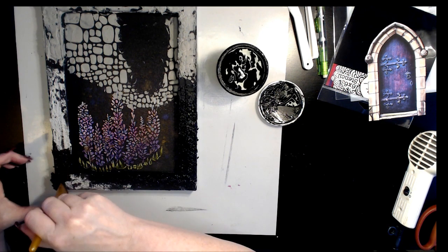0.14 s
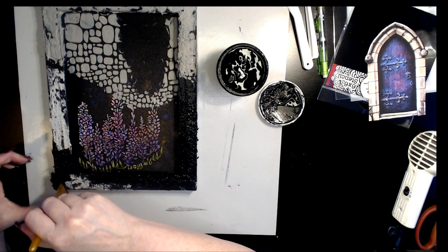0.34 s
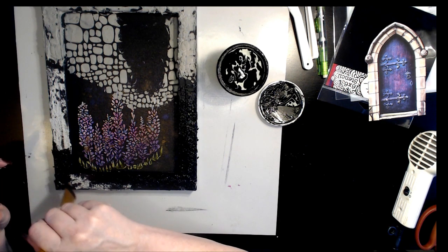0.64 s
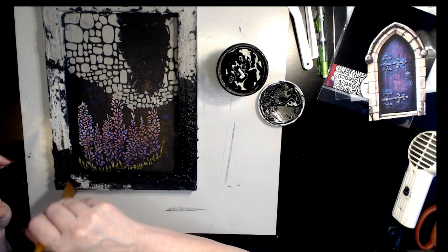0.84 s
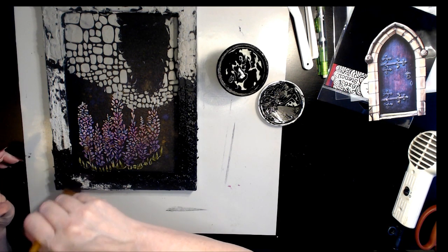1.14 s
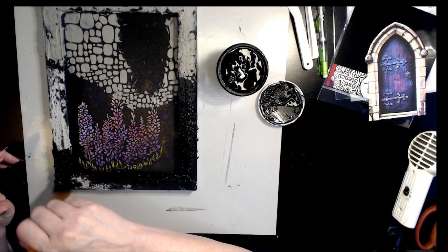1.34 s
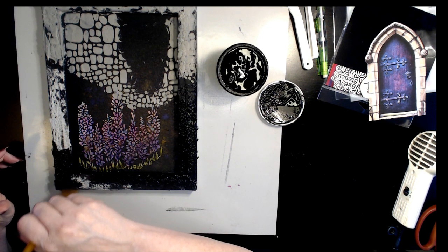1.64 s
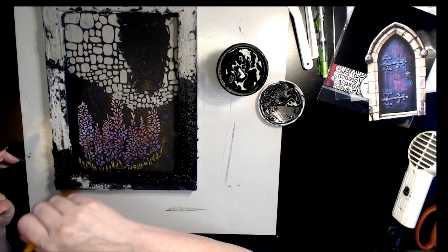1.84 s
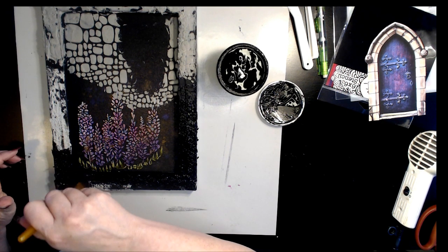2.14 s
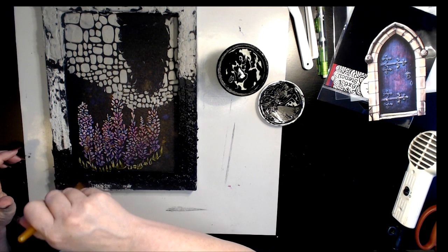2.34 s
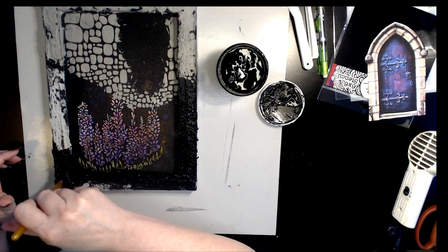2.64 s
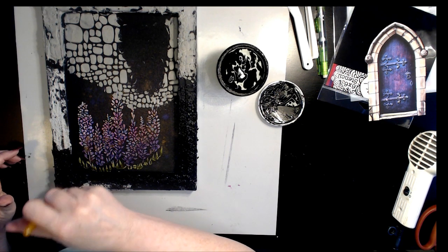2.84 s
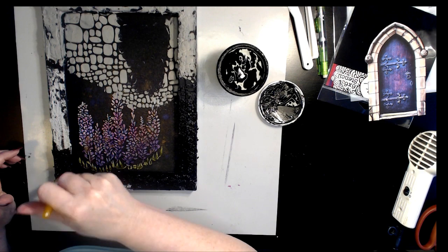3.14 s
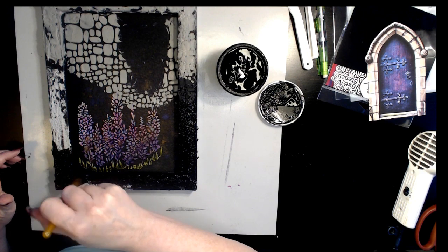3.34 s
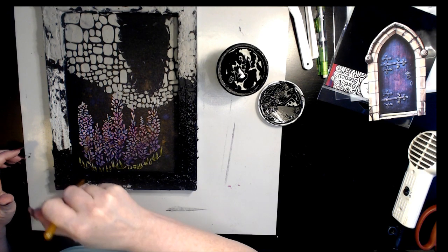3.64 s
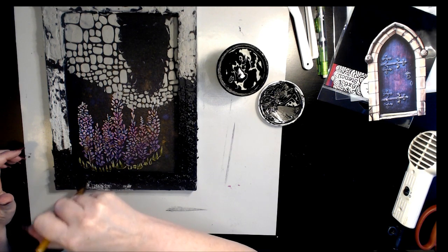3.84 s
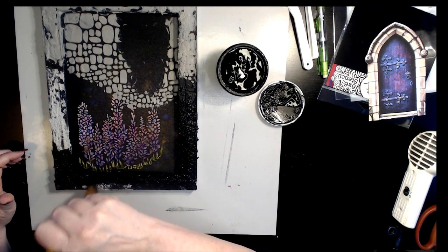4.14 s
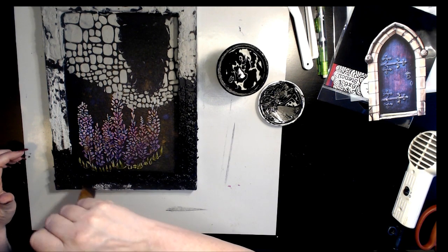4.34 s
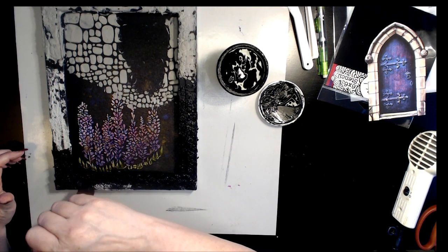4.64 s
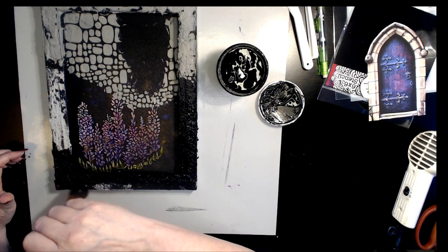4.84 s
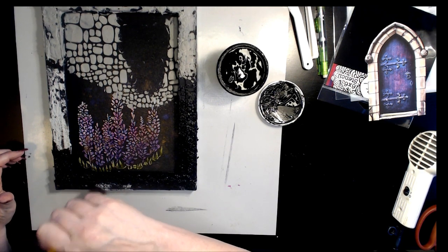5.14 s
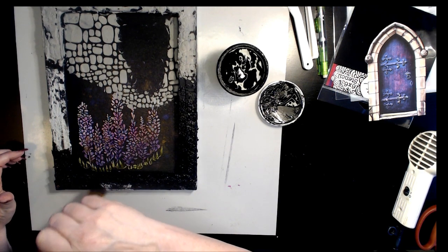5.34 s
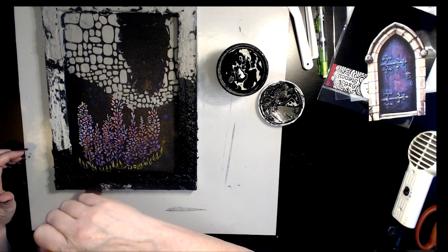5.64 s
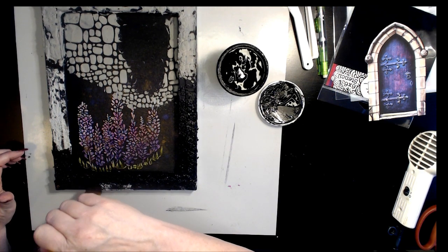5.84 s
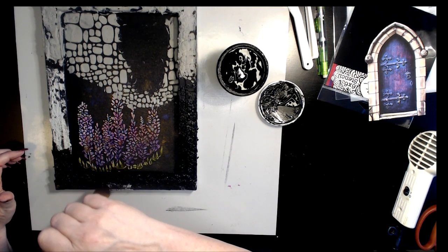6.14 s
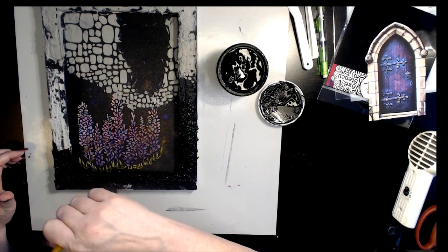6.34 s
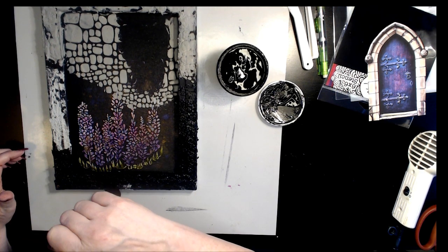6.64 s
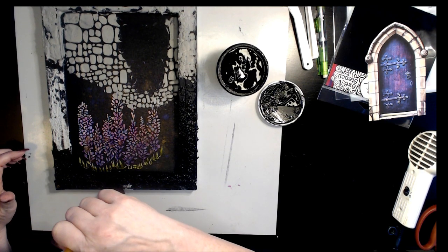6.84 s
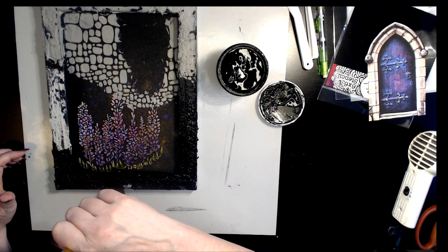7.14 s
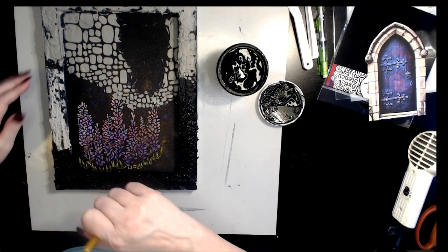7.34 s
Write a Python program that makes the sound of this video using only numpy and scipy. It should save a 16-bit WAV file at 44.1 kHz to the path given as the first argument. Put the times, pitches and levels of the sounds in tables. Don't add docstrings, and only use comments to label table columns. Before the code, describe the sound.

Close on a desk indoors, a computer fan hisses and hums steadily. A soft brush dabs a canvas at irregular short intervals, giving faint low thumps that shake the desk, with tiny sticky paint ticks. A distant engine briefly swells and recedes. From about 5.7 seconds the brush's metal collar knocks the wooden frame eight times, dipping softer, then ending very loud.

```python
import sys
import numpy as np
from scipy import signal
from scipy.io import wavfile
from scipy.ndimage import uniform_filter1d

SR = 44100
rng = np.random.default_rng(int(sys.argv[2]) if len(sys.argv) > 2 else 0)


def pcm_store(signal):
    levels = np.round(np.clip(np.atleast_2d(signal), -1, 1) * 32767)
    wavfile.write(sys.argv[1], SR, levels.astype(np.int16).T)


def magnitude_from_level(level_db):
    exponent = np.asarray(level_db, float) / 20
    return 10 ** exponent


N = 330309


def evened(x):
    return x / np.sqrt(np.mean(x ** 2) + 1e-20)


def add(mix, start_s, sound):
    part = mix[round(start_s * SR):][:len(sound)]
    part += sound[:len(part)]


def resonate(x, hz, width_hz):
    r = np.exp(-np.pi * width_hz / SR)
    pole = r * np.exp(2j * np.pi * hz / SR)
    return 2 * signal.lfilter([1 - r], [1, -pole], x).real


def resonate_twice(x, hz, width_hz):
    return resonate(resonate(x, hz, width_hz), hz, width_hz)


def ring(modes, pitch_factor=1):
    t = np.arange(SR // 3) / SR
    out = np.zeros(len(t))
    for hz, db, t60_s, sign in modes:
        out += sign * magnitude_from_level(db - 60 * t / t60_s) * np.sin(2 * np.pi * hz * pitch_factor * t)
    return out


def pulse(ms):
    bump = np.hanning(int(ms * SR / 1000) + 3)
    return bump / bump.sum()


# start in seconds, canvas level in dB, desk push in dB, spot along the edge (about
DABS = [(0.04, -57, -43, 0.025), (0.32, -47, -59, .5), (0.405, -50, -48, 0.86), (0.624, -54, -37, -.6),
        (0.804, -45, -56, 0.93), (0.973, -37, -29.5, 0.64), (1.075, -62, -39, -0.76),
        (1.156, -43, -34, 0.62), (1.299, -47, -44, 0.046), (1.516, -49, -28.5, -0.42),
        (1.697, -51, -36.5, .3), (1.921, -43, -34, -.1), (1.989, -60, -42, -.1),
        (2.141, -46.5, -38.5, -0.016), (2.363, -46, -43, 0.11), (2.558, -47, -34, 0.27),
        (2.653, -44.5, -26, -0.13), (2.849, -41, -29.5, 0.4), (3.035, -44, -20.5, 0.22),
        (3.205, -45.5, -28.5, 0.41), (3.385, -46, -27, -0.93), (3.909, -52, -40.5, -.5),
        (4.23, -37, -24, -0.57), (4.419, -40.5, -24.5, -0.92), (4.606, -59, -37.5, -.3),
        (4.94, -60, -34, -.1), (5.037, -58, -31.5, -1.1), (5.132, -41.5, -28.5, 1.08),
        (5.296, -44, -25.5, -.5), (5.627, -52, -32, -0.35)]
# frequency in Hz, level in dB, t60 in seconds, sign.
CANVAS = [(211, -9, 0.18, 1), (294, 2, 0.16, -1.12), (358, -0.5, 0.15, 0.91), (475.5, -1, 0.17, -0.91),
          (650, -7, 0.05, 1)]


def dabs():
    swell_s, push_lag_s = 0.0055, 0.0061
    out = np.zeros(N)
    t = np.arange(SR // 8) / SR
    pushes = []
    for s, canvas_db, push_db, spot in DABS:
        tilt_db_per_octave = 3.5 - 8 * spot
        modes = []
        for hz, db, t60_s, sign in CANVAS:
            shift, lift = rng.standard_normal(2)
            mode_db = db + 2.2 * lift + tilt_db_per_octave * np.log2(hz / 300)
            modes.append((hz * (1 + 0.016 * shift), mode_db, t60_s, sign))
        thud = ring(modes)[:len(t)] * (1 - np.exp(-(t / swell_s) ** 2))
        add(out, max(s - 0.003, 0), magnitude_from_level(canvas_db - 2.5) * thud / abs(thud).max())
        upper_db, low_db = -12 + 11 * spot, -1.2 * spot
        pushes.append((s + push_lag_s, push_db, upper_db, low_db))
    return out + desk(pushes)


# start in seconds, knock level in dB, desk push in dB, frame pitch factor.
KNOCKS = [
    (5.702, -17.5, -13, 0.92),
    (5.8801, -15.5, -13, 0.91),
    (6.056, -25.5, -18, 0.9),
    (6.222, -29, -20.5, 0.93),
    (6.4046, -18.5, -14, 0.91),
    (6.571, -8, -9, 0.98),
    (6.755, -9.5, -10.5, 0.97),
    (6.914, 0.18, -5, 0.99),
]
# frequency in Hz, level in dB, t60 in seconds, sign.
FRAME = [(222, -15.5, 0.11, 0.83), (268, -27, 0.16, 1), (362, -2, 0.051, 0.38), (479, 1, 0.021, -0.76),
         (510, -21, 0.058, 1), (635, -7, 0.015, -0.72), (718, -26, 0.12, 0.75), (776, -28, .06, -0.89),
         (933, -33.5, 0.14, 0.75), (1176, -34, 0.12, -0.55)]


def knocks():
    frame_db, chatter_db, chatter_t60_s = 4.5, -17.5, 0.094
    out = np.zeros(N)
    t = np.arange(3000) / SR
    for s, db, _, pitch_factor in KNOCKS:
        taps = rng.standard_normal(len(t)) * (rng.random(len(t)) < 0.08)
        force = taps * magnitude_from_level(chatter_db + 0.47 * db - 60 * t / chatter_t60_s) * (t > 0.006)
        force[0] = 1
        contact_ms = 0.94 - 0.04 * db
        force = signal.oaconvolve(force, pulse(contact_ms))
        add(out, s, magnitude_from_level(db + frame_db) * signal.oaconvolve(ring(FRAME, pitch_factor), force))
    return out + desk([(s, push_db, -3, 0) for s, _, push_db, _ in KNOCKS])


# frequency in Hz, level in dB, t60 in seconds, sign at the microphone foot.
DESK = [(28, -34.5, 0.18, -0.66), (48, -28.5, 0.34, 0.82), (64, -15.5, 0.2, -0.55),
        (85.17, 0.5, 0.47, 0.72), (95.6, 3, 0.24, -0.86), (119.7, -21, 0.53, 0.93)]
# frequency in Hz, level in dB, t60 in seconds, sign at the microphone foot.
DESK_UPPER = [(146.2, 1, 0.17, 0.85), (156, -1.5, 0.22, -0.81), (207.2, -2.5, 0.058, -0.79),
              (227.7, -5, 0.063, 1)]


def desk(pushes):
    push_ms, lag_ms, desk_db = 6.76, 2.84, 5
    out = np.zeros(N)
    for s, push_db, upper_db, low_db in pushes:
        low = ring([(hz, db + low_db * (hz < 90), t60_s, sign) for hz, db, t60_s, sign in DESK])
        modes = low + magnitude_from_level(upper_db + 3.5) * ring(DESK_UPPER)
        start_s = s + (lag_ms - push_ms / 2) / 1000
        add(out, start_s, magnitude_from_level(push_db + desk_db) * signal.oaconvolve(modes, pulse(push_ms)))
    return out


# start in
# seconds, peak in dB, centre in Hz.
TICKS = [(.022, -44, 5500), (0.6295, -30.5, 5000), (0.6293, -39, 9500), (.858, -44, 6300),
         (0.9925, -42, 6300), (1.100, -52, 14500), (1.431, -42, 12500), (1.615, -49, 11500),
         (1.7968, -43, 12000), (5.701, -56, 11000), (5.740, -36, 8200), (5.7508, -37.5, 8750),
         (5.760, -47, 9000), (5.916, -31.5, 9200), (5.926, -46, 9000), (6.081, -49, 9500),
         (6.090, -41, 10500), (6.118, -50, 11000), (6.257, -44, 9400), (6.273, -39, 8500),
         (6.436, -45, 9500), (6.446, -48, 12000), (6.531, -49, 10060), (6.9148, -29, 2000),
         (6.9147, -52, 5000)]


def ticks():
    snap_t60_s, tail_t60_s, tail_db = 0.0079, 0.054, -13.5
    out = np.zeros(N)
    t = np.arange(1600) / SR
    for s, peak_db, hz in TICKS:
        decay = magnitude_from_level(-60 * t / snap_t60_s) + magnitude_from_level(tail_db - 60 * t / tail_t60_s)
        burst = rng.standard_normal(len(t)) * decay
        burst[0] += 3
        snap = resonate_twice(burst, hz, 2400 + 0.33 * hz)
        add(out, s, magnitude_from_level(peak_db) * snap / abs(snap).max())
    return out


# frequency in Hz, width in Hz, level in dB.
BRISTLES = [(5500, 1500, 9.5), (7800, 2700, -2.5), (10300, 2000, -2), (14500, 4000, -26)]


def drag():
    slip_s, lead_s, slip_db, rise_db_per_s, fall_db_per_s = 6.748, 0.07, -45, 380, 300
    trail_db, trail_hold_s, trail_db_per_s, lift_db = -53.5, 0.057, 230, -66
    t = np.arange(-lead_s, 0.25, 1 / SR)
    trail = np.maximum(trail_db - trail_db_per_s * np.maximum(t - trail_hold_s, 0), lift_db)
    fall = np.maximum(slip_db - fall_db_per_s * t, trail)
    level = magnitude_from_level(np.where(t < 0, slip_db + rise_db_per_s * t, fall))
    grain_db = 3 * evened(uniform_filter1d(rng.standard_normal(len(t)), size=60))
    grains = rng.standard_normal(len(t)) * magnitude_from_level(grain_db)
    rush = sum(magnitude_from_level(db) * resonate_twice(grains, hz, 1.4 * width_hz) for hz, width_hz, db in BRISTLES)
    out = np.zeros(N)
    add(out, slip_s - lead_s, evened(rush) * level * signal.windows.tukey(len(t), 0.1))
    return out


def noise(spectrum, patchy_db):
    hz = np.fft.rfftfreq(2048, 1 / SR)
    f, db = np.transpose(spectrum)
    real, imag, patches = rng.standard_normal((N // 512 + 5, 1025, 3)).T
    patches = uniform_filter1d(patches, size=14, axis=0)
    patches = evened(uniform_filter1d(patches, size=5, axis=1))
    colour_db = np.interp(np.log(hz + 1), np.log(f + 1), db, left=-90, right=-90)[:, None]
    bins = (real + 1j * imag) * magnitude_from_level(colour_db + patchy_db * patches)
    return evened(signal.istft(bins, nperseg=2048, noverlap=1536)[1][:N])


def lines(base_hz, orders):
    t = np.arange(N) / SR
    out = np.zeros(N)
    for k, db in orders:
        out += np.sqrt(2) * magnitude_from_level(db) * np.sin(2 * np.pi * (k * base_hz * t + rng.random()))
    return out


# frequency in Hz, density in dB per Hz.
HISS = [(500, -24.5), (750, -11.5), (1070, -9.5), (1230, -5), (1390, -9), (1700, -5), (2620, -2.5),
        (3350, -12), (4350, -11), (5200, -23), (7700, -25), (11000, -30.5), (17300, -34.5), (17500, -72)]
# frequency in Hz, density in dB per Hz.
RUMBLE = [(12, -45), (20, -10.5), (38, -11.5), (66, -13), (92, 2), (117, -13.5), (177, -17), (412, -20),
          (780, -20.5), (900, -24), (1170, -63), (1980, -120)]
# frequency in Hz, width in Hz, level in dB.
WHINE = [(2612, 12, -70), (3856, 5, -75), (4229, 6, -75), (7712, 10, -87)]
# frequency in Hz, width in Hz,
# level in dB.
SHAKE = [(85.4, 5.5, -54.5), (96.34, 3.6, -53.5), (121.35, 4.2, -57), (29.9, 14, -61), (2624, 620, -55.5)]
# multiple of the base rate, rms in dB.
BLADES = [(2, -71), (4, -64.5), (5, -76), (6, -55), (12, -76)]
# multiple of the base rate, rms in dB.
BUS = [(4, -78), (5, -79), (6, -83), (7, -88), (9, -88), (10, -83), (11, -81), (12, -81), (13, -81.5),
       (14, -84.5), (15, -91), (16, -98), (17, -92)]
# multiple of the base rate, rms in dB.
COIL = [(5, -86), (8, -85), (9, -86), (11, -82), (12, -94), (13, -92.5)]
# time in seconds, third order in dB.
SPIN = [(0, -41), (1.5, -43.5), (2.2, -45.5), (3, -38), (3.8, -43.5), (4.5, -48), (5, -39), (6.8, -53),
        (7.5, -38.5)]


def fan():
    t = np.arange(N) / SR
    air = magnitude_from_level(-49) * noise(HISS, patchy_db=1.0) + magnitude_from_level(-51) * noise(RUMBLE, patchy_db=0.5)
    tones = lines(248.7, BLADES) + lines(999.95, BUS) + lines(1277.7, COIL)
    fuzzy = np.zeros(N)
    for hz, width_hz, db in SHAKE + WHINE:
        fuzzy += magnitude_from_level(db) * evened(resonate_twice(rng.standard_normal(N), hz, width_hz))
    turn = 2 * np.pi * 29.75 * t
    third = magnitude_from_level(np.interp(t, *np.transpose(SPIN))) * np.cos(3 * turn - 0.6)
    fourth = magnitude_from_level(-55) * np.cos(4 * turn - 1.5)
    return air + tones + fuzzy + np.sqrt(2) * (third + fourth)


# time in seconds, firing rate in Hz, level in dB.
ENGINE = [
    (1.45, 74.5, -75),
    (1.75, 79.1, -66),
    (1.9, 77.2, -55),
    (2.1, 69.9, -50),
    (2.6, 67.5, -70),
    (3.4, 65.2, -51.5),
    (4.4, 64.7, -64),
    (6., 64, -70),
]


def engine():
    pipe_db, pipe_from_s, pipe_to_s, rise_db_per_s, fall_db_per_s = -53, 1.65, 2.05, 150, 9
    s, rates_hz, levels_db = np.transpose(ENGINE)
    t = np.arange(N) / SR
    first_db = np.interp(t, s, levels_db)
    before_s, after_s = np.maximum(pipe_from_s - t, 0), np.maximum(t - pipe_to_s, 0)
    second_db = pipe_db - rise_db_per_s * before_s - fall_db_per_s * after_s
    turns = 2 * np.pi * np.cumsum(np.interp(t, s, rates_hz)) / SR
    orders = magnitude_from_level(first_db + 6.5) * np.sin(turns) + magnitude_from_level(second_db + 2.5) * np.sin(2 * turns)
    return orders * (t > s[0]) * (t < s[-1])


def scene():
    return (dabs() + knocks() + ticks() + drag() + fan() + engine())[None]


def top_cut(x):
    return signal.sosfilt(signal.butter(12, 17350, fs=SR, output="sos"), x)


def record(dry):
    limited = dry / (1 + dry ** 30) ** (1 / 30)
    lowpass = signal.firwin(1023, 17200, fs=SR)
    mix = signal.oaconvolve(limited, lowpass[None], "same")
    return top_cut(mix)


dry = scene()
out = record(dry)
pcm_store(out)
```